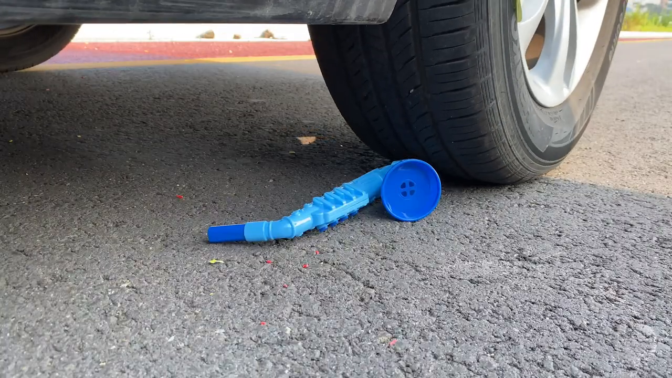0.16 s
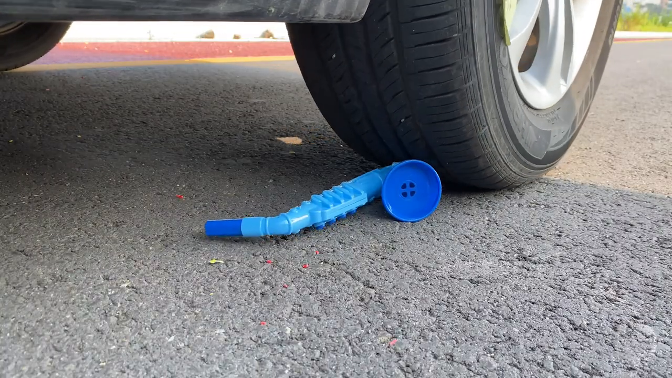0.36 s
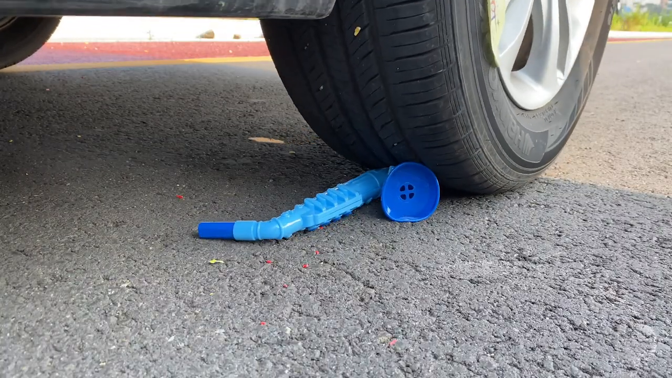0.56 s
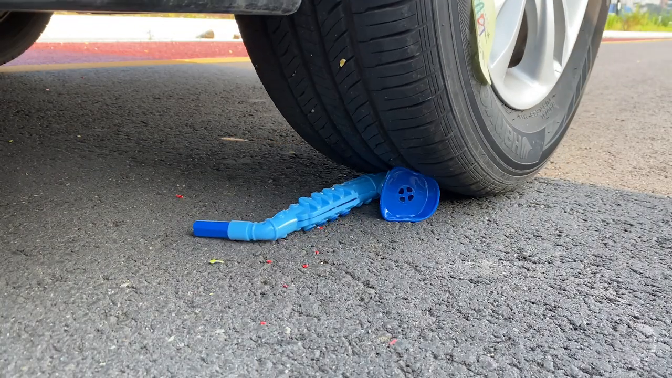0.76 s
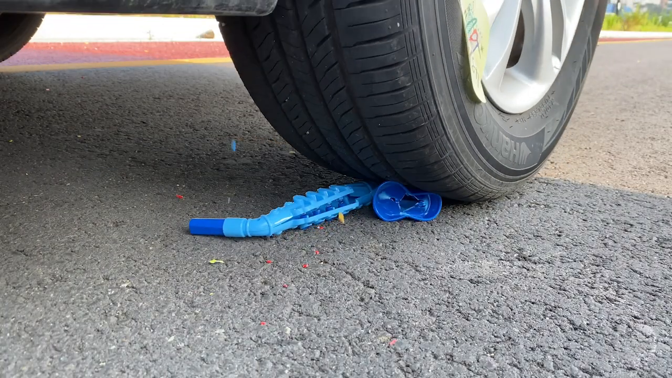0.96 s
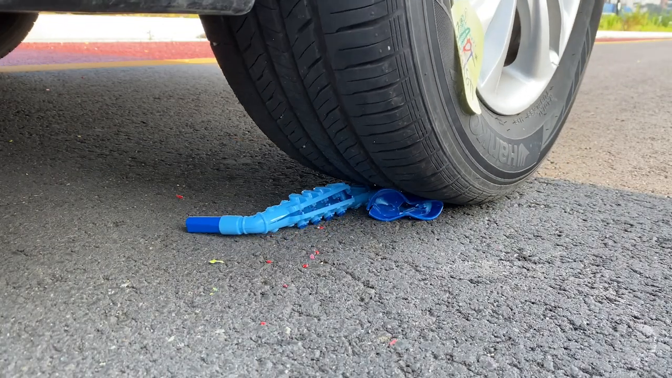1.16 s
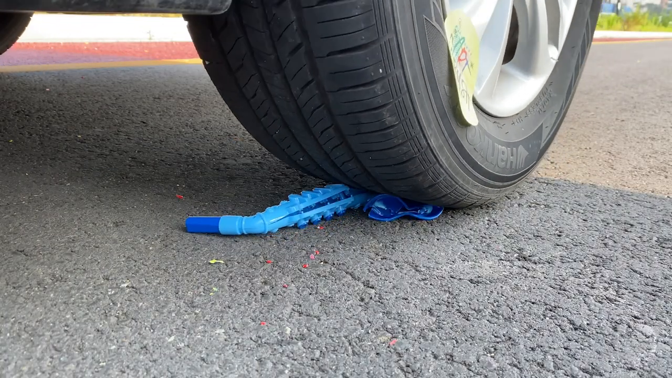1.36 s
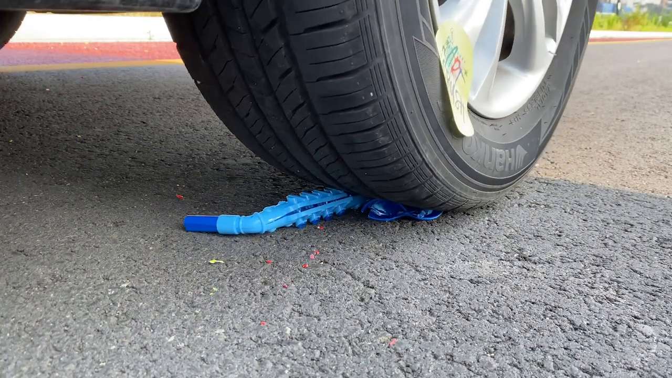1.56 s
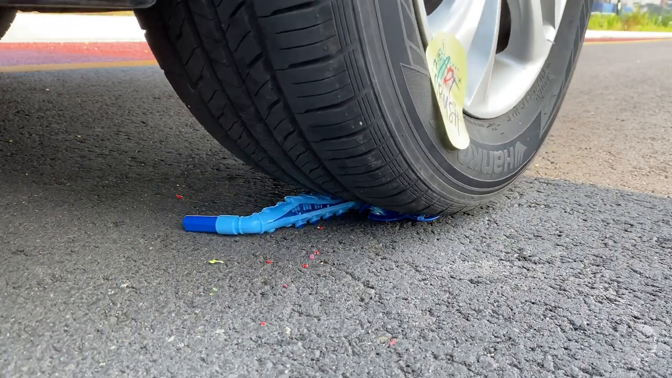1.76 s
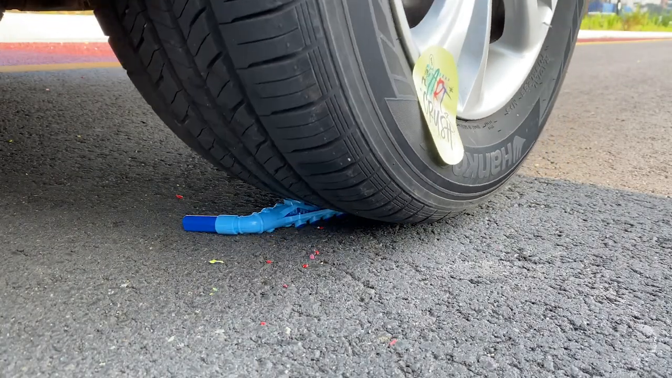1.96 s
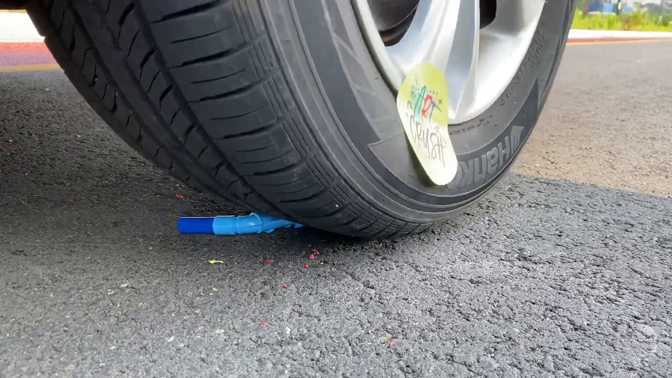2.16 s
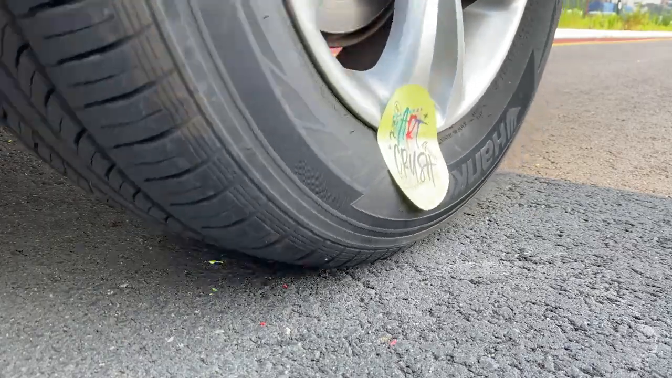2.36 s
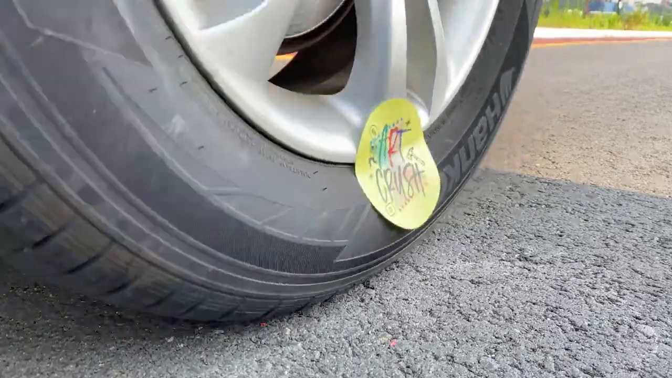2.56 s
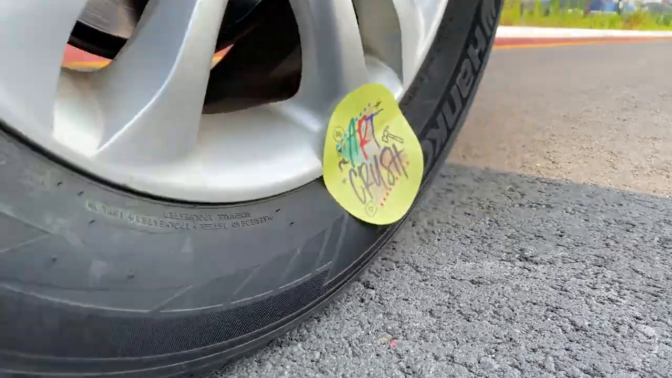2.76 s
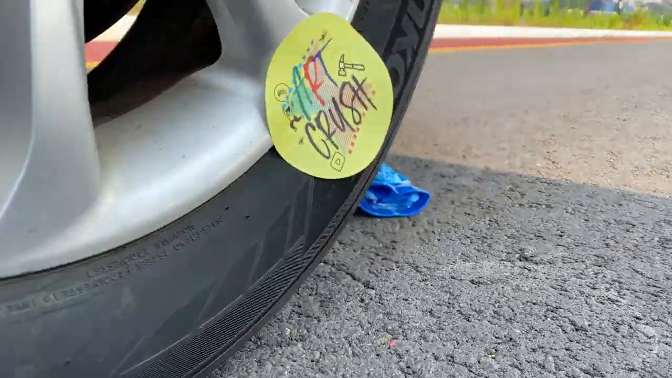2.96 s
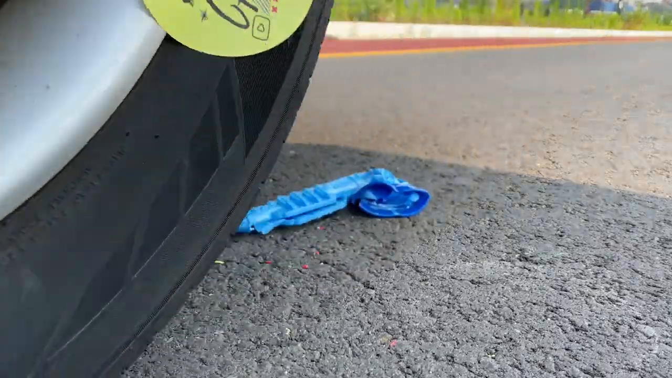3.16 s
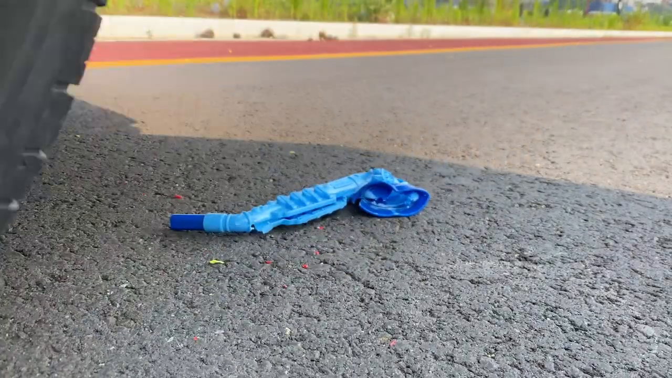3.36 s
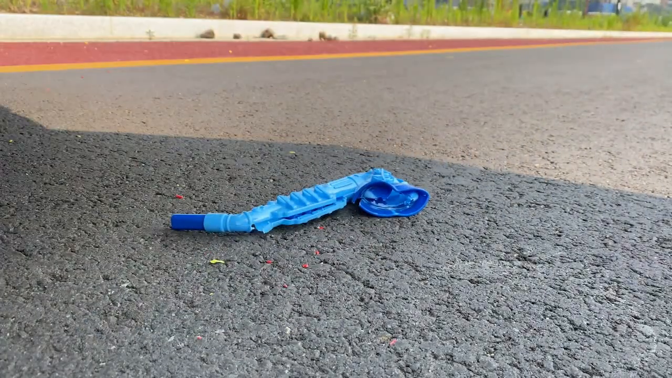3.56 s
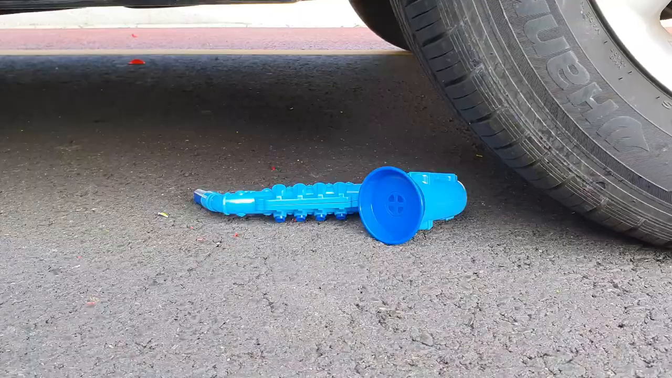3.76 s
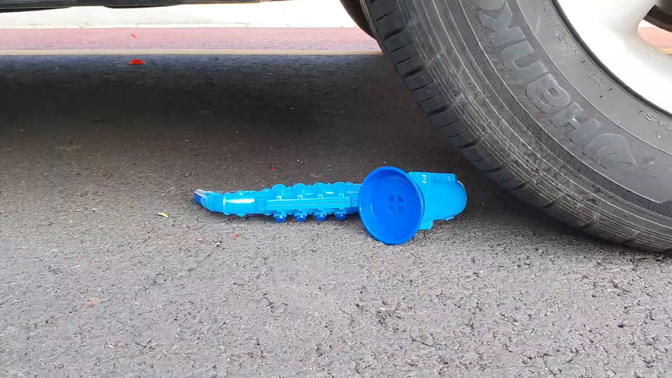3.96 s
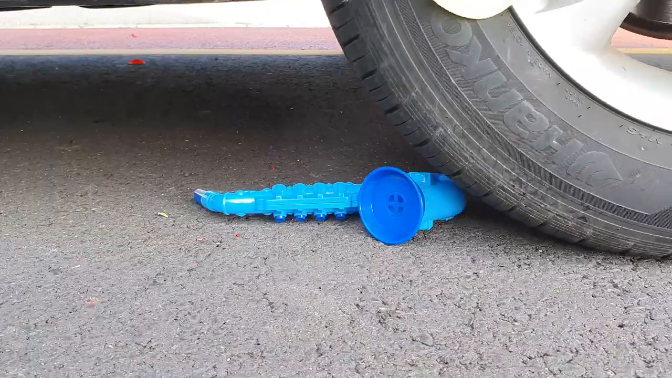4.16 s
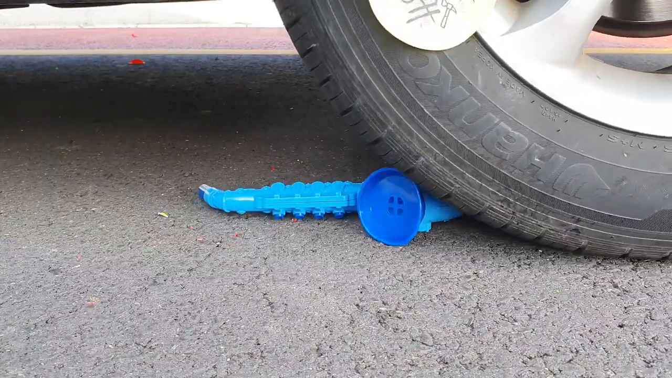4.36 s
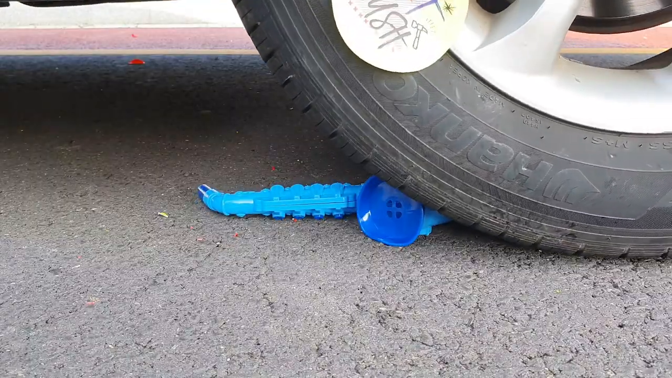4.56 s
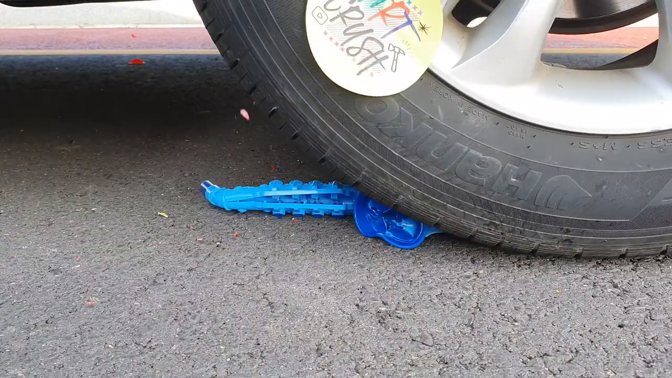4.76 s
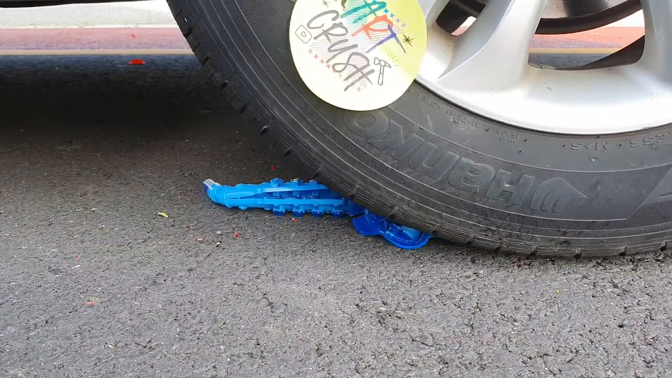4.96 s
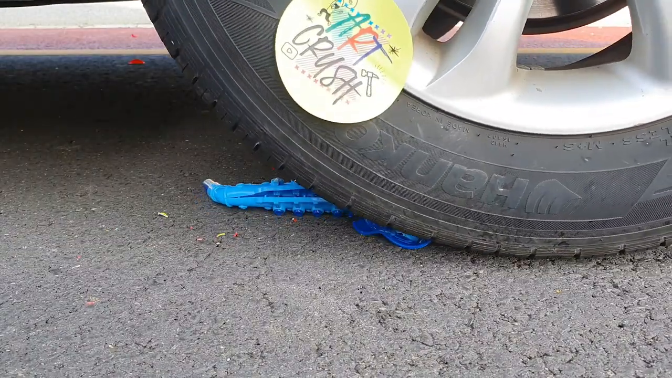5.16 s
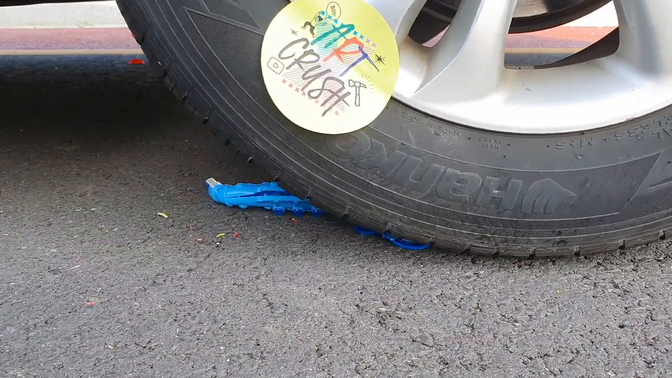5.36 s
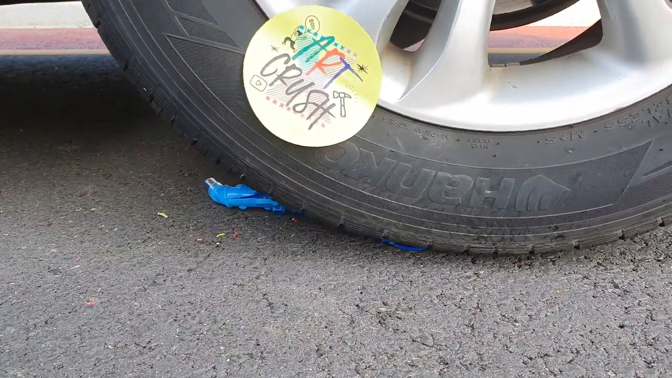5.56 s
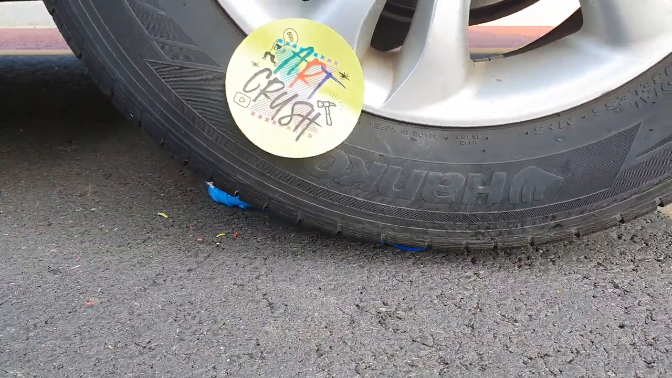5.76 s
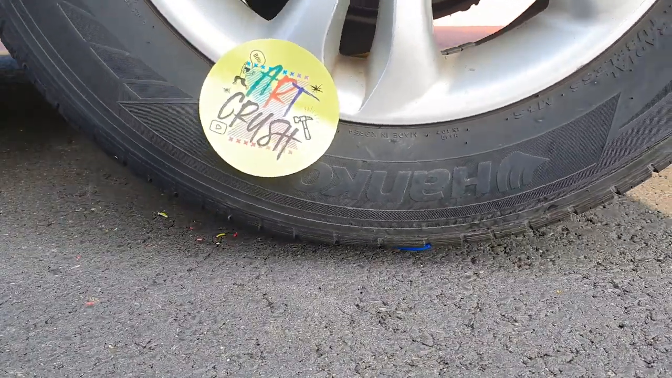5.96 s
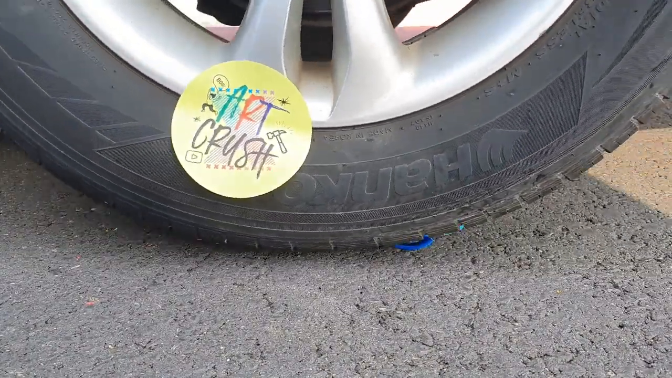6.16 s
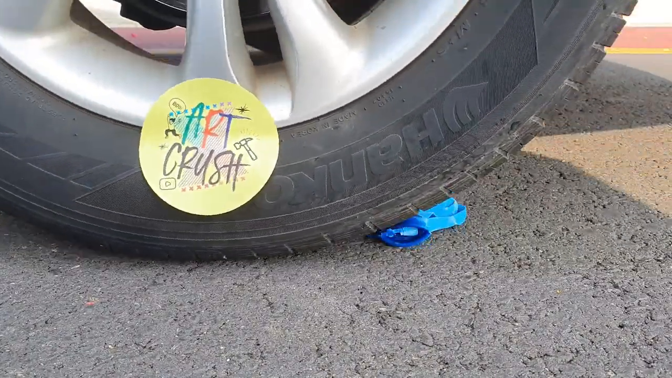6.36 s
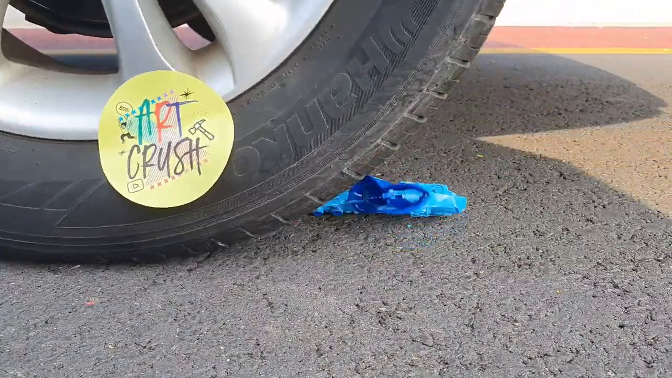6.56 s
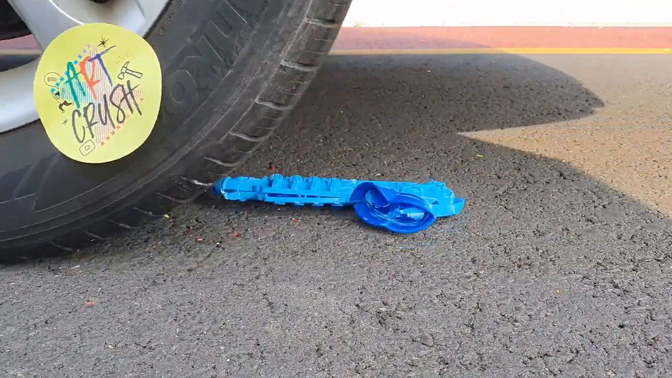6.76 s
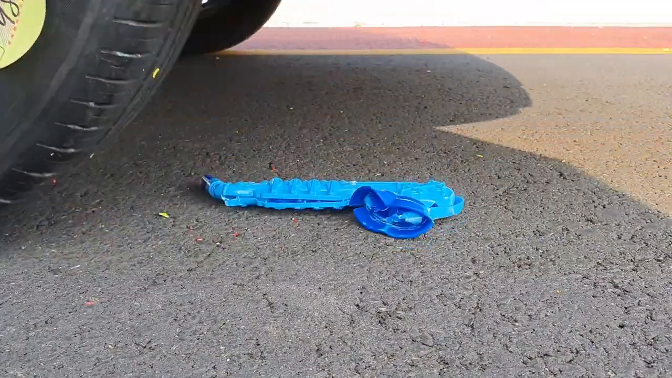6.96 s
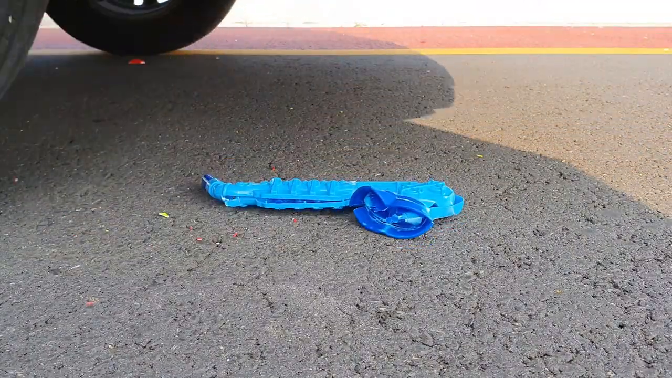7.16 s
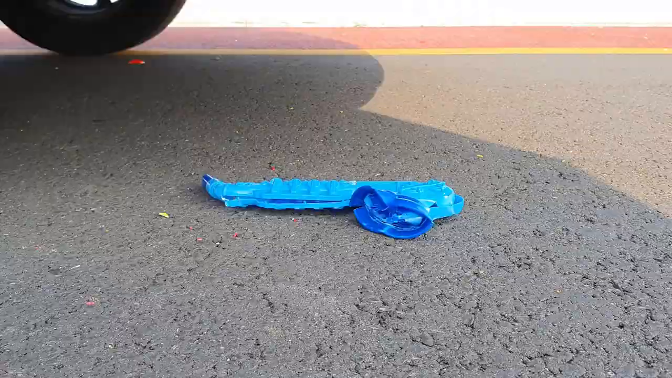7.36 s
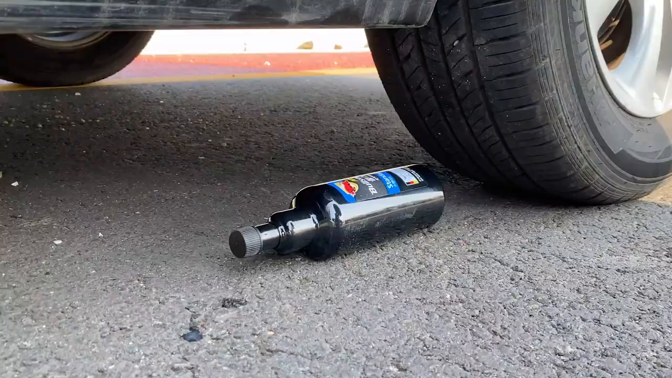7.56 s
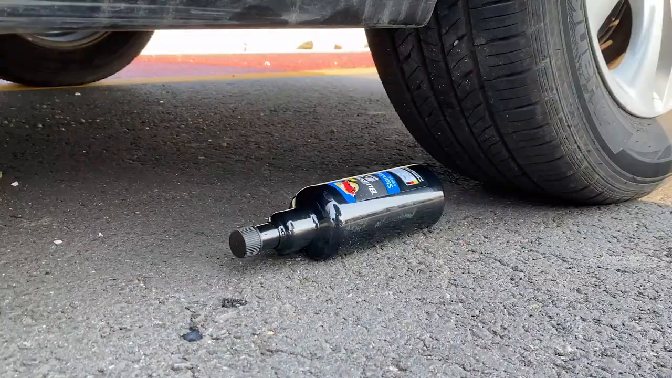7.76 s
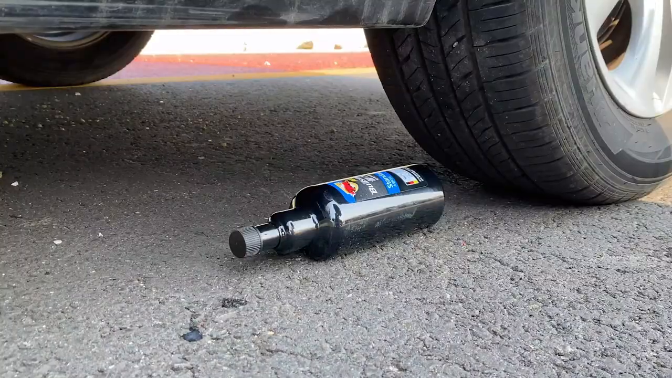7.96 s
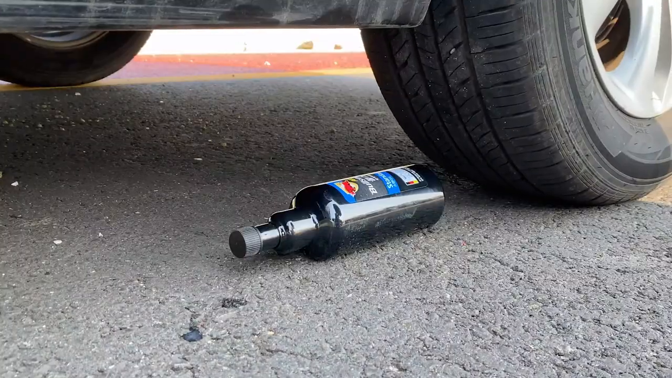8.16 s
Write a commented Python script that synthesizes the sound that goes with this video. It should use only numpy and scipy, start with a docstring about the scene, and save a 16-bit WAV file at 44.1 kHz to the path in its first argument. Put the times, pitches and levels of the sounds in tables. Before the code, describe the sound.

Outdoor road, microphone near the ground beside a slowly rolling tyre. Quiet rumble and airy hiss come first, then a rapid burst of brittle plastic snaps with hollow thumps, thinning to scattered clicks and crumbling. A second, steadier run of loud cracks follows over soft humming, the echoes short between road and underbody. It ends with only faint rolling noise.

```python
"""Asphalt, close to the microphone: a car creeps up with low rumble, hiss and a faint engine throb. From half a
second its tyre crushes a plastic toy saxophone: cracks echo between road and underbody, and the hollow bell
caves in with falling thumps. A faint hum sounds briefly just after one second; plastic and grit crunch and thin
out. At 3.8 s the background dips and changes, and the tyre crushes a second toy with more hum, more cracks and
faint brake squeals. At 7.66 s the background dips and changes once more. Sources are filtered noise, bar the
thumps and hum, which are sines."""
import sys
import numpy as np
from scipy import signal
from scipy.fft import rfft, irfft, next_fast_len
from scipy.io import wavfile
from scipy.ndimage import uniform_filter1d, map_coordinates

SR = 44100
rng = np.random.default_rng(int(sys.argv[2]) if len(sys.argv) > 2 else 0)


def waveform_to_disk(signal):
    """Save audio, clipped to [-1, 1], as 16-bit WAV at the path in sys.argv[1]."""
    frames = np.transpose(np.atleast_2d(signal))
    scaled = np.clip(frames, -1, 1) * 32767
    samples = np.round(scaled).astype(np.int16)
    wavfile.write(sys.argv[1], SR, samples)


N = 362502
TIME = np.arange(N) / SR

# three stretches of background, each with its own levels: start_s, end_s
STRETCHES = [(0, 3.77), (3.838, 7.625), (7.655, 8.3)]
# background of each stretch: rumble_db, throb_db, hiss_db, whistle_db, hiss_fall_db (how far hiss and whistle
# sink once the tyre meets the toy)
BACKGROUNDS = [(-57.5, -83.5, -56.5, -77, 7.5), (-59.5, -62.5, -54.5, -79.5, 11),
               (-58.5, -71, -57.5, -74.5, 0)]
# colour of the air noise: frequency_hz, gain_db
HISS_COLOUR = [(410, -28), (700, -1.5), (819, -5), (1040, -10), (1890, -8), (2700, -12.5), (3320, -13.5),
               (8420, -25), (11200, -24), (16000, -30.5)]
# thin whines of the car, relative to one another: pitch_hz, level_db
WHINES = [(1868, -72.5), (3709, -81.5), (3871, -78), (5965, -80), (7257, -83.5)]
# colour of the low rolling rumble: frequency_hz, gain_db
RUMBLE_COLOUR = [(12, -47), (20, -14), (93, 2.5), (111, -3.5), (145, -3), (268, -10.5), (296, -12.5),
                 (327, -14), (400, -20), (520, -50), (880, -120)]
# colour of the tread noise: frequency_hz, gain_db
TREAD_COLOUR = [(120, -22), (220, -9), (450, 4.5), (900, -13), (1500, -18.5), (4000, -39.5)]
# the car lurches as it starts, climbs or drops: centre_s, half_length_s, rumble_db
LURCHES = [(.05, 0.58, -65), (1.1, .4, -66), (4.25, 0.34, -53), (4.87, .08, -50), (2.15, 0.04, -53.5),
           (6.15, 0.47, -56.5), (6.75, 0.15, -53), (8.07, .11, -48)]
# course of the drive hum: time_s, pitch_hz
HUM_PITCH = [(1.2, 221), (3.85, 241.2), (4.4, 236), (4.9, 224.7), (5.25, 215), (6.0, 224.8), (6.8, 217)]
# partials of the hum: start_s, end_s, multiple (of the pitch), level_db (at the start, before the fade)
HUM_PARTIALS = [(1.0, 1.35, 1, -59), (1.0, 1.35, 2, -66.5), (3.783, 5.393, 2, -57.5),
                (3.8, 4.902, 3.5, -66.5), (5.95, 6.64, 1, -50), (5.95, 6.645, 2, -61.5)]
# faint brake squeals: centre_s, half_length_s, pitch_hz, level_db
SQUEALS = [(2.79, .11, 2676, -63.5), (5.2, .15, 2370, -72.5), (6.55, .1, 2290, -68.5)]
# the tyre on each toy: meets_s, buckles_s, leaves_s, crunch_db (under full load)
CRUSHES = [(0.501, .99, 4.1, -60.5), (4.272, 4.76, 7.7, -63)]
# colour of plastic and grit: frequency_hz, gain_db
GRIT_COLOUR = [(180, -41), (300, -40.5), (470, -7.5), (656, -9), (701, 0), (1150, -7.5), (1580, -1),
               (2440, -2), (4160, -9), (5700, -12), (9550, -18.5), (11900, -18), (16000, -27)]
# crumbling bursts, scrapes and rustles of plastic and grit: centre_s, half_length_s, level_db
CRUNCH_BURSTS = [(.65, 0.018, -31.5), (.972, .004, -25), (1.03, .01, -28), (4.457, .006, -30),
                 (5.562, .004, -16), (1.595, 0.022, -46), (1.985, .01, -44), (2.38, 0.087, -47.5),
                 (2.922, 0.024, -39), (2.98, 0.019, -56), (3.061, 0.023, -44), (3.222, .008, -55.5),
                 (4.389, 0.0047, -32.5), (4.42, 0.065, -37), (5.377, 0.011, -50.5), (5.752, 0.0042, -40.5),
                 (5.856, 0.014, -39), (6.14, 0.047, -38), (6.245, 0.0054, -32), (6.4, 0.4, -52),
                 (6.558, 0.01, -45.5), (6.678, 0.02, -34.5), (6.745, .012, -46), (6.79, .1, -48.5),
                 (6.818, 0.02, -40), (6.901, 0.015, -38.5), (6.985, .012, -59)]
# hollow parts caving in: start_s, level_db, start_pitch_hz, glide_s, length_s
THUMPS = [(.6291, -7, 480, .0053, .0185), (1.0346, -9, 600, .014, .0062), (1.3034, -6.5, 385, .0051, .019)]
# cracks of the shell: start_s, level_db, then knock_db, wall_db, snap_db (re that level, before the trims
# in cracks()), bright_db (tilt of the snap, full from 11 kHz), ring_hz (resonance of the shell)
CRACKS = [(0.55, -27.5, -11, 2.5, -5.5, -3, 2230), (0.6256, -26.5, 2, -12, 12.5, 2, 2420),
          (.670, -32, -20, 1, -4, -17, 1570), (.688, -23, -19, -1.5, -9.5, 4, 2970),
          (.697, -23.5, -16, -28, 8.5, 3, 1640), (0.702, -17, -13, -7, 1.5, -14, 1580),
          (0.7696, -18, -14, 4, 5, 1, 2180), (0.7931, -18.5, -20.5, -5, -2.5, -15, 1470),
          (.857, -20, -17.5, -9, -3.5, 3, 2180), (0.9676, -12.5, -18.5, -7.5, 0, -1.5, 2540),
          (1.0101, -14, -18.5, -8, 0, -18, 2260), (1.033, -16.5, -5, -7, 6, -11.5, 1840),
          (1.085, -36.5, -12, -3, 14.5, -5, 2870), (1.176, -40, -29, -22, 13.5, -4, 2730),
          (1.194, -18, -31, -9.5, -4.5, -10, 2680), (1.236, -48, 3, 0, 7, -9, 2980),
          (1.273, -18, -26, -34, 3, -26, 2260), (1.282, -33, -9, -4, -20, -10, 2200),
          (1.3003, -16.5, -18.5, -12.5, 2.5, 3, 2600), (1.547, -38.5, -4.5, -13, -2.5, -11, 2290),
          (1.711, -38, -11, 5.5, -8, -7, 1550), (1.791, -20, -16.5, -2, 2, -0.5, 3120),
          (1.831, -32, -21, 4, 11, -18, 3390), (1.8464, -16.5, -31, -3, -2.5, -8.5, 2550),
          (1.933, -30, -33, -8.5, -3, -17, 2830), (1.953, -23.5, -34, -7, -1, -9, 3400),
          (1.995, -44.5, -8.5, 7.5, 13, -19, 1520), (2.069, -31, -35, -16, -0.5, -11, 3350),
          (2.1105, -16.5, -7, 0.5, -1, -5, 2200), (2.163, -46, 11, 20, -2, -6, 1450),
          (2.1846, -44.5, -3, 6, 19, -7, 2110), (2.2391, -25.5, -27.5, -7, -3, -1, 3250),
          (2.246, -27, -17, -3, 3, -10, 3130), (2.303, -20, -17, -0.5, -4.5, -9, 2800),
          (2.3174, -22, -8.5, 6, 0.5, -11, 2570), (2.3631, -21.5, -9.5, -4, 6, 2, 3540),
          (2.402, -32, -35, 1, 9.5, -6.5, 3400), (2.4762, -42, -14, -7, 12.5, -15, 2650),
          (2.4843, -20, -15, -5.5, 6, -4, 2700), (2.507, -38, 1.5, 4, 13.5, -4, 3010),
          (2.532, -24.5, -16, -9.5, 0, -9, 3200), (2.5696, -20.5, -32, -24, -1, -17, 2920),
          (2.596, -37.5, -18, -18, 7, -17, 2530), (2.668, -24, -13, 1, 2.5, -11, 2600),
          (2.895, -49.5, -6, -3, 4, 8, 2850), (3.046, -47.5, -1.5, -0.5, 11.5, -15, 3090),
          (3.093, -44.5, -9, -14, -11, -14, 2850), (3.133, -47.5, -14, -14, -4, -19, 1600),
          (4.317, -27, -8.5, 1.5, -14.5, -2.5, 2390), (4.393, -22.5, -14.5, -9, 4, -1, 1690),
          (4.416, -30.5, -10, 4, -2, -10, 2000), (4.436, -28, -16, 6, -13, -6, 1860),
          (4.45, -24.5, -23, 2.5, -17, -5, 1990), (4.4632, -15, -18.5, -3, -14, -3, 3360),
          (4.466, -17.5, -12.5, -3, -2, -3, 2430), (4.535, -17.5, -18.5, -2, -6, -5, 1680),
          (4.560, -25.5, -39, -3.5, -4, -10, 1500), (4.623, -22.5, -19.5, -5, -10.5, -7.5, 2320),
          (4.734, -13, -24.5, -6, -14, 3, 2230), (4.777, -15.5, -12, -10, -8.5, -4, 2070),
          (4.8, -15.5, -9, -4, 1.5, 0, 1740), (4.851, -34.5, -8, -8, 10.5, -2.5, 2220),
          (4.942, -37.5, -23, -27, 8, 4, 2460), (4.96, -19.5, -26, -13.5, -5.5, -1, 1940),
          (5.038, -21.5, -28, -26, -3.5, -5, 2500), (5.047, -34, -9, -26, -15, -15, 2190),
          (5.067, -16.5, -14.5, -18.5, 1, -0.5, 2140), (5.312, -43.5, -11.5, -1.5, -3, -13, 2130),
          (5.352, -41.5, -16.5, -20, -19, -12.5, 2140), (5.479, -37, -9, 7, -15, 5.5, 1750),
          (5.557, -16, -21, -8.5, -3.5, 6, 2080), (5.597, -41.5, -11, 10.5, 17, -8, 3370),
          (5.6124, -12, -30, -5, -11.5, 1, 2400), (5.700, -32.5, -20, -7, -6, -5, 2200),
          (5.719, -19.5, -31, -11.5, -10, -6, 1770), (5.760, -42, -5, 7, 9, -3.5, 2150),
          (5.835, -30.5, -21, -18, -6.5, -8, 3380), (5.876, -13.5, -7, -2, -5.5, -7.5, 2260),
          (5.928, -39.5, 8.5, 18, -5, 1, 2110), (5.952, -36, -0.5, -4, 13.5, 0.5, 2200),
          (6.0059, -20.5, -21, -5.5, -7.5, -4, 2780), (6.017, -26.5, -25, -3, -1.5, 0, 1600),
          (6.069, -20, -13, 9.5, -8, -9, 1760), (6.085, -19.5, -8, 6.5, -4.5, 0, 1670),
          (6.130, -17.5, -14.5, -8, 2, 0.5, 1700), (6.169, -32, -27, 2, 8.5, 2, 3370),
          (6.2519, -18, -10, -1.5, 3, -2, 2610), (6.273, -32, -1, -17, 10.5, -6, 1810),
          (6.2987, -23.5, -12, -3, 0, -8, 3570), (6.336, -18, -27, -16.5, -5, 2, 2170),
          (6.363, -32.5, -28, -28, 3.5, -11, 2410), (6.436, -20.5, -16, 5, 2, -1, 2210),
          (6.6715, -29.5, -21, -12, 1.5, 16, 1650), (6.686, -32, -22, 4.5, -25, -9, 2400),
          (6.700, -32, -8.5, 2, -9, 6, 1980), (6.825, -28, -10.5, -34, -3.5, -7, 1650),
          (6.8591, -34.5, -11, -25, -16, 0, 2410)]
# colour of the snap at the torn edge: frequency_hz, gain_db
SNAP_COLOUR = [(3500, -4.5), (5100, 5), (6000, 1.5), (7000, 7.5), (8500, 1.5), (10500, 6), (13000, 3),
               (16000, -2)]
# how each toy faces the microphone: left_lead_ms (until it buckles), top_db (gain from 13 kHz up)
FACINGS = [(0.049, -2), (-0.000073, 2)]

HISS_FALL_S = .3  # time the hiss takes to sink
THROB_HZ, THROB_WIDTH_HZ = 32.8, 16  # firing of the engine
DRONE_HZ, DRONE_WIDTH_HZ = 95, 30  # a drone near 95 Hz swells with every lurch
TREAD_DB, TREAD_LOAD_DB = -8.5, 1  # tread noise re the rumble, and its rise under full load
HUM_EDGE_S, HUM_FADE_DB_PER_S = 0.07, 6
SETTLE_DB, SETTLE_T60_S = -27, 0.21  # crunch of the torn edges after a crack: level re the crack, decay
CRACK_ECHO_DB = -2  # scatter from road and underbody, before each part's own echo trim
STIFF_WALL_HZ, SLACK_WALL_HZ = 1350, 790  # the wall's resonance drops once the shell has buckled
LEAD_SHIFT_MS = .03  # the cracks move to the left once the shell has buckled
TOP_HZ = 16300  # band limit


def amp(db):
    """Amplitude factor of a level in dB."""
    return 10 ** (np.asarray(db) / 20)


def unit(x):
    """x scaled to rms 1."""
    return x / np.sqrt(np.mean(x ** 2) + 1e-20)


def along(points, hz):
    """Interpolate (Hz, value) points on a log frequency axis."""
    f, v = np.transpose(points)
    return np.interp(np.log(hz + 1), np.log(f + 1), v)


def wobble(rate):
    """A smooth random curve, rate knots a second."""
    return map_coordinates(rng.standard_normal(int(N * rate / SR) + 4), [TIME * rate])


def filtered(x, response):
    """x times a response of frequency."""
    m = next_fast_len(N + SR // 2)
    return irfft(rfft(x, m) * response(np.fft.rfftfreq(m, 1 / SR)), m)[..., :N]


def causal(gain):
    """The minimum-phase response with this gain."""
    cepstrum = irfft(np.log(np.maximum(gain, 1e-6)))
    half = len(cepstrum) // 2
    cepstrum[1:half] *= 2
    cepstrum[half + 1:] = 0
    return np.exp(rfft(cepstrum))


def band(hz, low_hz, high_hz, order=4):
    """Gain of a band-pass."""
    return ((1 + (low_hz / (hz + 1)) ** (2 * order)) * (1 + (hz / high_hz) ** (2 * order))) ** -.5


def peak(hz, centre_hz, width_hz):
    """Gain of one resonance."""
    return 1 / np.hypot(1, 2 * (hz - centre_hz) / width_hz)


def pair(size, side_db):
    """Left and right noise: a common part and an opposed part at side_db."""
    mid, side = rng.standard_normal((2, size))
    return unit(mid + amp(side_db) * np.array([side, -side]))


def rush(colour, side_db):
    """Coloured stereo noise of rms 1."""
    return unit(filtered(pair(N, side_db), lambda hz: amp(along(colour, hz))))


def resonant_noise(centre_hz, width_hz, side_db):
    """Stereo noise of rms 1 through one resonance, applied twice."""
    return unit(filtered(pair(N, side_db), lambda hz: peak(hz, centre_hz, width_hz) ** 2))


def add(track, s, sound):
    """Mix a sound in at time s."""
    part = track[..., round(s * SR):][..., :sound.shape[-1]]
    part += sound[..., :part.shape[-1]]


def swells(rows):
    """Sum of bell-shaped swells given as (centre_s, half_length_s, level_db)."""
    return sum(amp(db) * np.exp(-((TIME - s) / length) ** 2) for s, length, db in rows)


def load(meets, leaves):
    """Share of the wheel's weight on a toy: it grows as the tyre climbs on and falls as it rolls off."""
    return np.sin(np.pi * np.clip((TIME - meets) / (leaves - meets), 0, 1))


def per_stretch():
    """Each column of the backgrounds, held through its stretch."""
    later_starts = [start for start, _ in STRETCHES[1:]]
    return np.transpose(BACKGROUNDS)[:, np.searchsorted(later_starts, TIME)]


def air(whine_db=-14, whine_width_hz=50):
    """Hiss with thin whines and a high whistle; all sink once the tyre meets the toy."""
    _, _, hiss_db, whistle_db, fall_db = per_stretch()
    sunk = np.zeros(N)
    for (meets, *_), (_, end) in zip(CRUSHES, STRETCHES):
        sunk += np.clip((TIME - meets) / HISS_FALL_S, 0, 1) * (TIME < end)

    def whine_gain(hz):
        return sum(amp(db) * peak(hz, f, whine_width_hz) ** 2 for f, db in WHINES)

    whistle = resonant_noise(10835, width_hz=150, side_db=-3)
    whines = unit(filtered(pair(N, side_db=-7), whine_gain))
    flutter = amp(.6 * wobble(6))
    hiss = amp(hiss_db) * flutter * (rush(HISS_COLOUR, side_db=3) + amp(whine_db) * whines)
    return amp(-fall_db * sunk) * (hiss + amp(whistle_db) * whistle)


def engine():
    """The firing of the engine throbs: noise through a low resonance, held at one level per stretch."""
    _, throb_db, *_ = per_stretch()
    return amp(throb_db) * resonant_noise(THROB_HZ, THROB_WIDTH_HZ, side_db=-15)


def rolling(drone_db=-5):
    """Rumble, tread and a low drone swell with every lurch; the tread grows louder under load."""
    rumble_db, *_ = per_stretch()
    lurching = swells(LURCHES)
    weight = sum(load(meets, leaves) for meets, _, leaves, _ in CRUSHES)
    rumble = amp(wobble(8)) * rush(RUMBLE_COLOUR, side_db=-13.5)
    tread = amp(TREAD_DB + TREAD_LOAD_DB * weight + wobble(10)) * rush(TREAD_COLOUR, side_db=-1.5)
    drone = resonant_noise(DRONE_HZ, DRONE_WIDTH_HZ, side_db=-13.5)
    return (amp(rumble_db) + lurching) * (rumble + tread) + lurching * amp(drone_db) * drone


def hum():
    """The drive hums in sine partials on a drifting pitch; each swells in and slowly fades."""
    pitch = np.interp(TIME, *np.transpose(HUM_PITCH))
    phase = 2 * np.pi * np.cumsum(pitch * (1 + .0012 * wobble(5.6))) / SR
    out = np.zeros(N)
    for start, end, multiple, db in HUM_PARTIALS:
        gate = np.clip(np.minimum(TIME - start, end - TIME) / HUM_EDGE_S, 0, 1)
        fading = amp(db - HUM_FADE_DB_PER_S * (TIME - start))
        out += gate * fading * np.sin(multiple * phase)
    return np.sqrt(2) * out  # levels are rms


def squeals(width_hz=70):
    """The brakes sing faintly as they hold the car back: narrow bands of noise."""
    out = np.zeros((2, N))
    for s, length, f, db in SQUEALS:
        out += swells([(s, length, db)]) * resonant_noise(f, width_hz, side_db=-6.5)
    return out


def car():
    """Engine, rolling noise, hum and brakes, a little stronger on the left."""
    return (rolling() + engine() + hum() + squeals()) * amp([[.5], [-.5]])


def patchy(x, depth_db):
    """Each slip excites other resonances: random gain over a few hundred Hz and a few milliseconds."""
    z = signal.stft(x, nperseg=256)[2]
    field = rng.standard_normal(z.shape[1:])
    field = uniform_filter1d(uniform_filter1d(field, size=3, axis=0), size=3, axis=1)
    return signal.istft(z * amp(depth_db * unit(field)), nperseg=256)[1][:, :N]


def crunch(slips_per_s=3000, spread_db=3.0):
    """Tiny slips of plastic and grit follow the load, flare after each crack and swell in short bursts."""
    pressed = sum(amp(db) * load(meets, leaves) for meets, _, leaves, db in CRUSHES)
    settling, t = np.zeros(N), np.arange(SR // 4) / SR
    for s, db, *_ in CRACKS:
        add(settling, s, amp(db + SETTLE_DB - 60 * t / SETTLE_T60_S))
    strength = np.sqrt(pressed ** 2 + settling ** 2 + swells(CRUNCH_BURSTS) ** 2)
    slip_sizes = amp(spread_db * np.minimum(rng.exponential(size=N), 3))
    slips = (rng.random(N) < slips_per_s / SR) * slip_sizes
    grains = unit(slips * pair(N, side_db=-1.0)) + .6 * pair(N, side_db=-7.5)
    coloured = filtered(patchy(grains, depth_db=6.0), lambda hz: amp(along(GRIT_COLOUR, hz)))
    stick_slip = amp(1.5 * wobble(70))
    return strength * stick_slip * unit(coloured)


def thumps(lead_rad=.33, lead_hz=55, rest_hz=47, boom_db=-32, boom_t60_s=1.0):
    """A hollow part gives way: its pitch drops quickly as the wall goes slack, and a low boom lingers."""
    out, t = np.zeros((2, N)), np.arange(SR // 2) / SR
    for s, db, start_hz, glide, length in THUMPS:
        pitch = rest_hz + (start_hz - rest_hz) / (1 + t / glide) ** 1.9
        body = np.exp(-(t / length) ** 1.35)
        boom = amp(boom_db - 60 * t / boom_t60_s)
        swell = (1 - np.exp(-t / .0007)) * (body + boom)
        lead = lead_rad * pitch / (pitch + lead_hz) * np.array([[1], [-1]])  # the left side leads
        add(out, s, -amp(db) * swell * np.sin(2 * np.pi * np.cumsum(pitch) / SR + lead))
    return out * amp([[.7], [-.7]])


def wall_modes(hz, count, depth_db):
    """The crumpling wall has new resonances and gaps at every crack."""
    position = np.sqrt(hz / hz[-1]) * (count - 1)
    return amp(depth_db * map_coordinates(rng.standard_normal(count), [position]))


def fracture(t, echo_db, t60, run, rise=0.0015, strain_db=-21):
    """Tiny splits build up, a tear runs through the plastic at t = 0; road, tyre and underbody scatter it."""
    after = np.maximum(t, 0)
    tear = pair(len(t), side_db=-10.0) * (1 - np.exp(-after / rise)) * np.exp(-after / run)
    tear /= np.sqrt(np.mean(np.sum(tear ** 2, axis=1)) / (SR / 200))  # the energy of 5 ms at rms 1
    splits = pair(len(t), side_db=-9) * amp(strain_db) * np.exp(-np.abs(t) / .0036)
    knots = t[::96]
    ragged = amp(2 * np.interp(t, knots, rng.standard_normal(len(knots))))
    arrival = 1 - np.exp(-(after / 0.0026) ** 2)
    echo = pair(len(t), side_db=-2) * ragged * arrival * amp(echo_db - 60 * after / t60)
    return splits + tear + echo


def cracks(size=8192):
    """Each fracture shakes and knocks the tyre, flexes the wall, rings the shell and snaps at the torn edge."""
    build_up_s, attack = .016, SR // 180  # attack: samples over which the loudest moment is taken
    out, t, hz = np.zeros((2, N)), np.arange(size) / SR - build_up_s, np.fft.rfftfreq(size, 1 / SR)
    tyre, knock = band(hz, 80, 220, order=3), band(hz, 240, 560, order=3)
    middle, high, top = band(hz, 560, 1400), band(hz, 1450, 3800), band(hz, 3300, 16500)
    tilt = np.clip(np.log2((hz + 1) / 5500), 0, 1)
    for s, db, knock_db, wall_db, snap_db, bright_db, ring_hz in CRACKS:
        toy = int(s > STRETCHES[1][0])
        lead_ms, top_db = FACINGS[toy]
        wall_hz = STIFF_WALL_HZ
        if s >= CRUSHES[toy][1]:  # the shell has buckled
            wall_hz = SLACK_WALL_HZ
            lead_ms += LEAD_SHIFT_MS
        wall = middle * (0.31 + peak(hz, wall_hz, width_hz=190))
        ring = high * (.32 + peak(hz, ring_hz, width_hz=200))
        snap = top * amp(along(SNAP_COLOUR, hz) + bright_db * tilt)
        facing = amp(along([(8000, 0.0024), (13000, top_db)], hz))
        crumple = wall_modes(hz, count=160, depth_db=2.0) * facing
        lead = np.exp(1j * np.pi * hz * lead_ms / 1000 * np.array([[1], [-1]]))  # half to each side
        # colour, level_db, echo_db, decay_s, tear_run_s: the low parts linger longest
        parts = [(tyre, knock_db - 9.0, 3, .2, .002),
                 (knock, knock_db, -1.5, .11, .0014),
                 (wall, wall_db - 3.5, -1.3, .068, .0016),
                 (ring, .2, -.4, .066, .0014),
                 (snap, snap_db + 0.22, -1, .058, .0009)]
        for colour, part_db, echo_db, t60, run in parts:
            source = rfft(fracture(t, CRACK_ECHO_DB + echo_db, t60, run=run))
            sound = irfft(source * causal(colour * crumple) * lead)
            loudest = uniform_filter1d(np.mean(sound ** 2, axis=0), attack, mode="constant").max()
            add(out, s - build_up_s, amp(db + part_db) * sound / np.sqrt(loudest))
    return out * amp([[.3], [-.3]])


def scene():
    """The toy over the background, which dips briefly to a tenth between the stretches."""
    in_stretch = sum((TIME >= start) * (TIME < end) * 1.0 for start, end in STRETCHES)
    heard = np.maximum(uniform_filter1d(in_stretch, size=200), .1)
    return (air() + car()) * heard + crunch() + thumps() + cracks()


def record(dry):
    """The loudest peaks are rounded off; a steep filter removes what lies above the band limit."""
    rounded = dry / (1 + np.abs(dry / 1.05) ** 6) ** (1 / 6)
    return filtered(rounded, lambda hz: 1 / np.hypot(1, (hz / TOP_HZ) ** 90))


dry = scene()
out = record(dry)
waveform_to_disk(out)
```